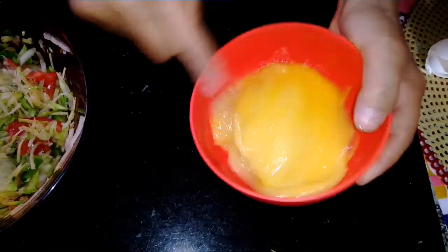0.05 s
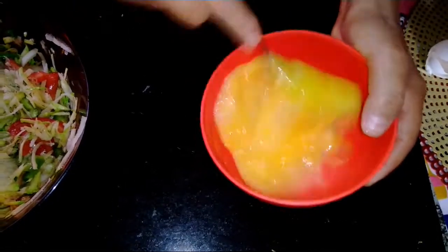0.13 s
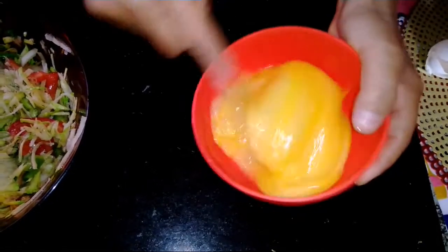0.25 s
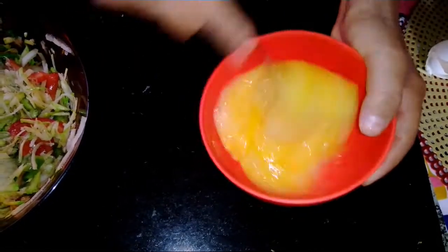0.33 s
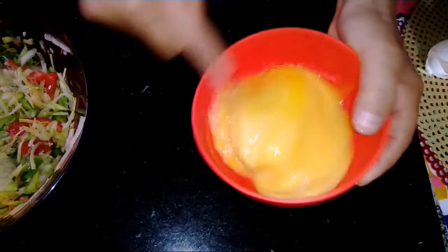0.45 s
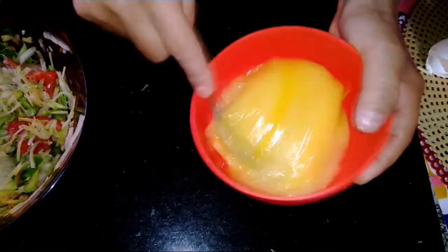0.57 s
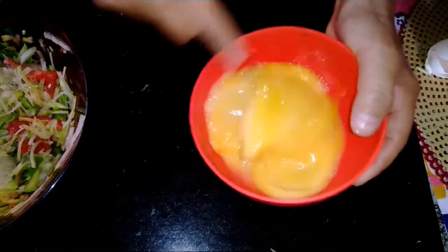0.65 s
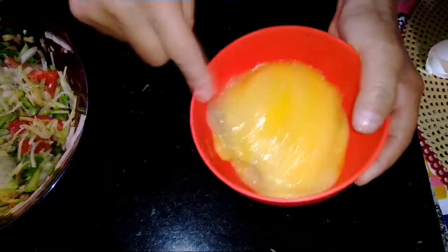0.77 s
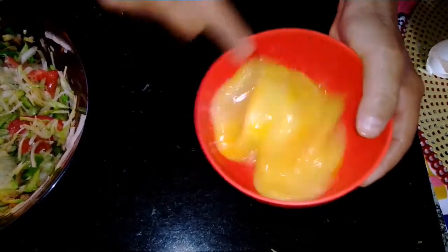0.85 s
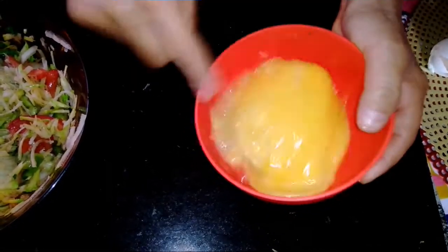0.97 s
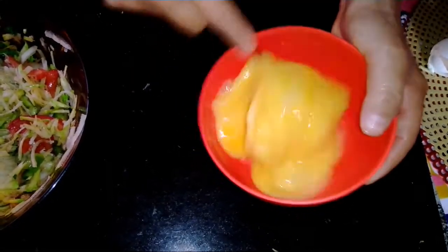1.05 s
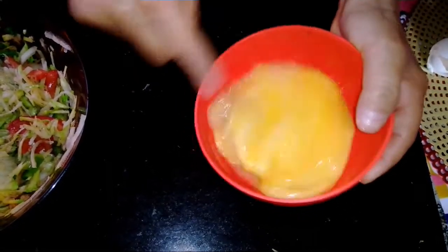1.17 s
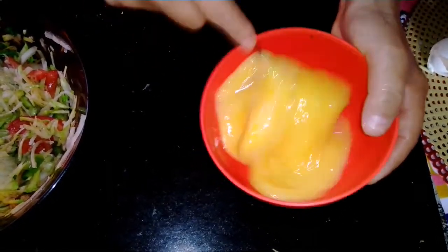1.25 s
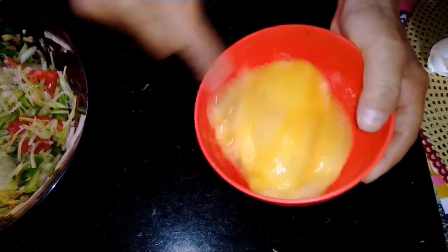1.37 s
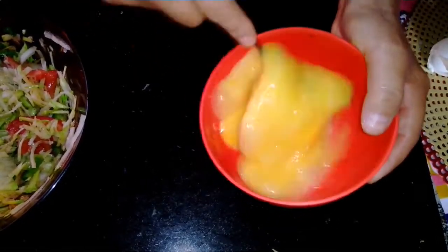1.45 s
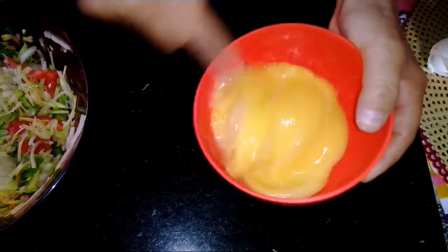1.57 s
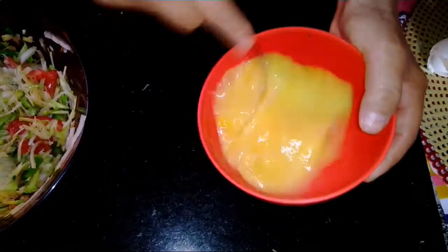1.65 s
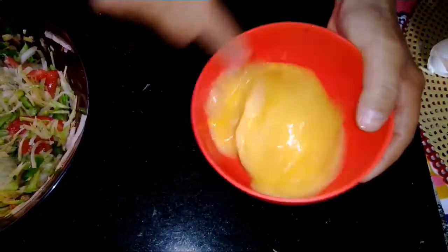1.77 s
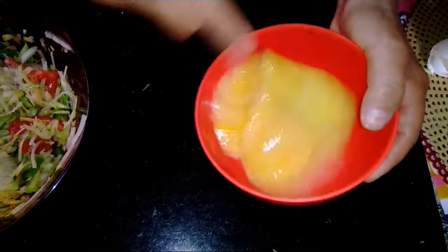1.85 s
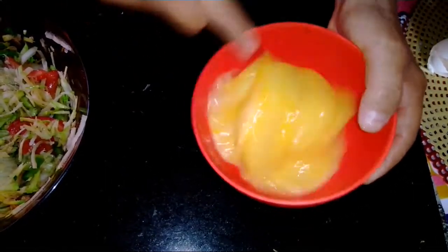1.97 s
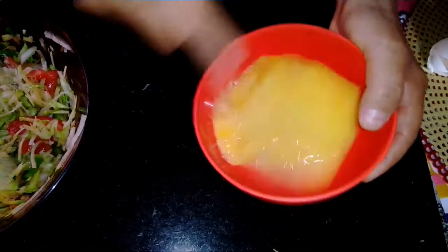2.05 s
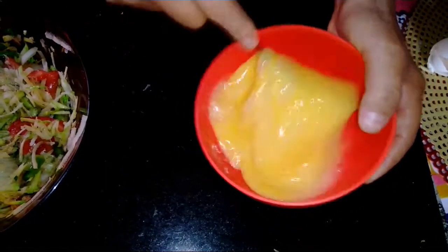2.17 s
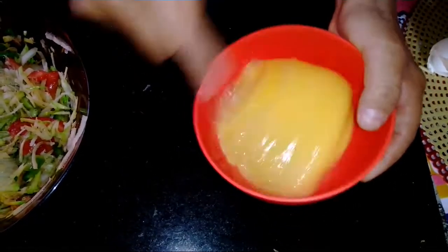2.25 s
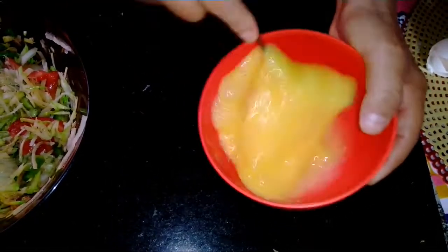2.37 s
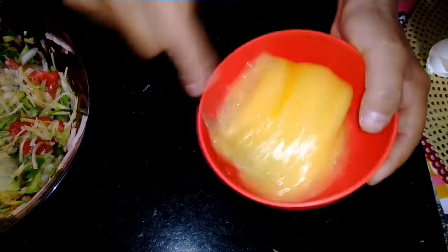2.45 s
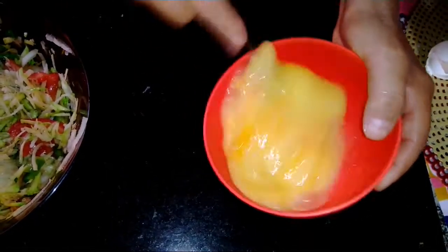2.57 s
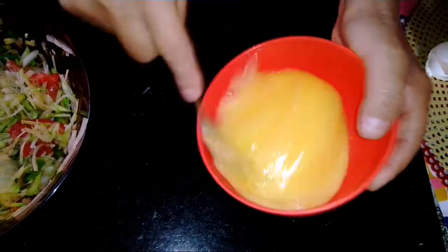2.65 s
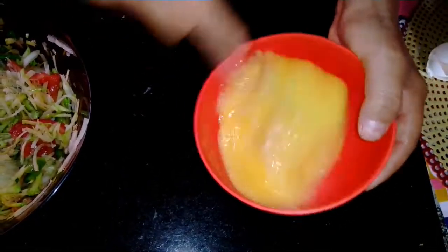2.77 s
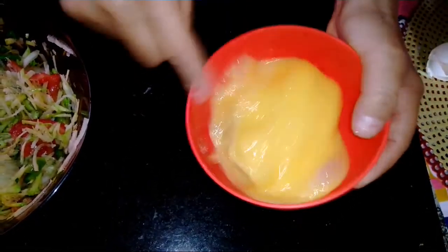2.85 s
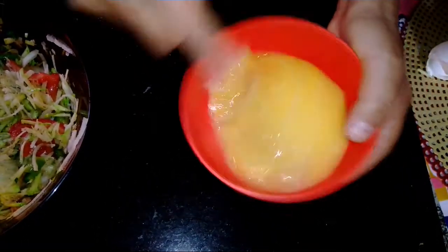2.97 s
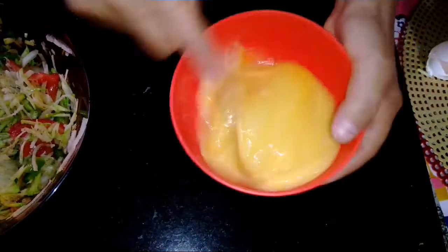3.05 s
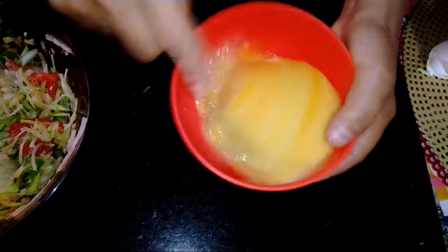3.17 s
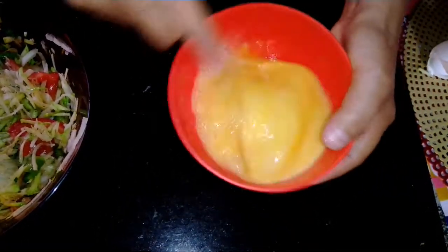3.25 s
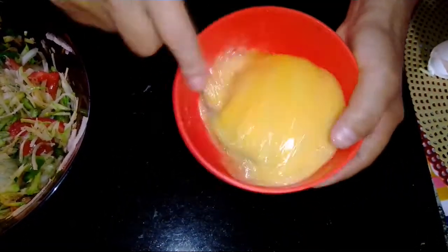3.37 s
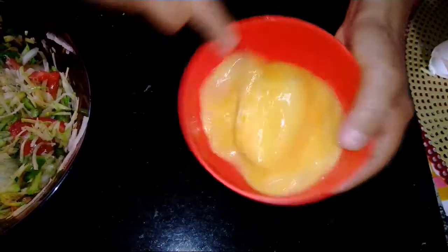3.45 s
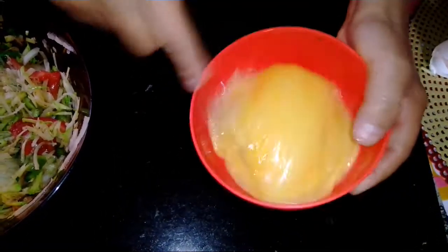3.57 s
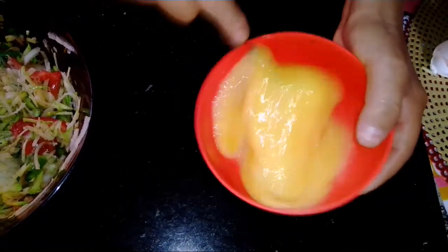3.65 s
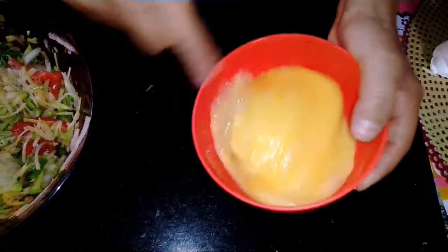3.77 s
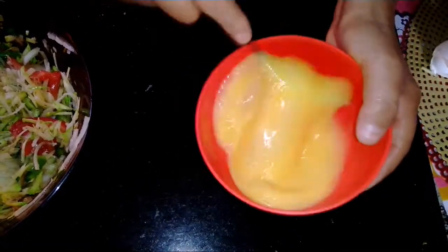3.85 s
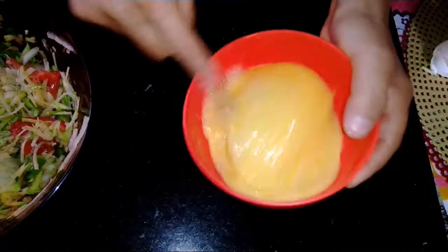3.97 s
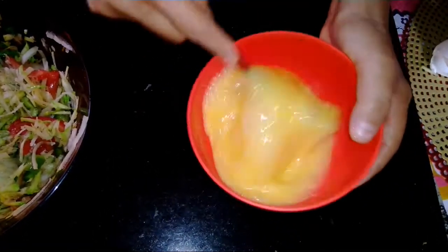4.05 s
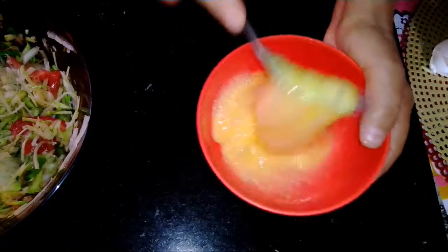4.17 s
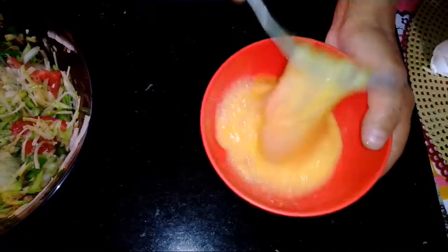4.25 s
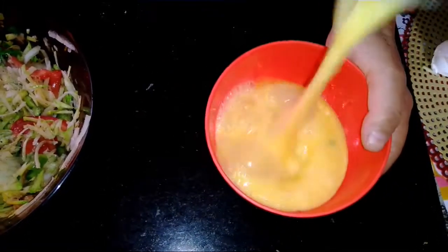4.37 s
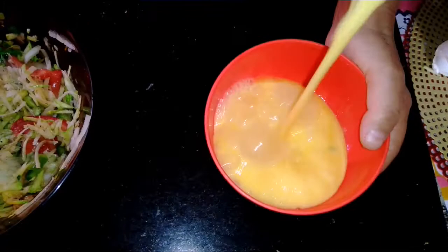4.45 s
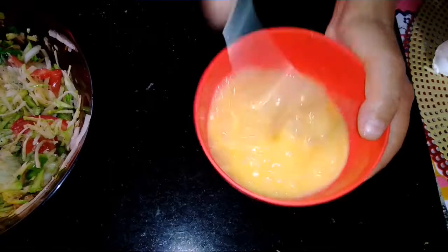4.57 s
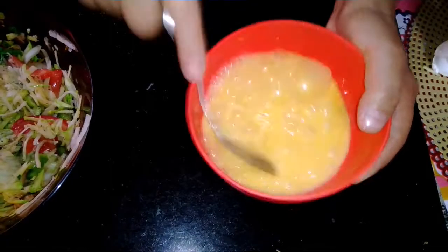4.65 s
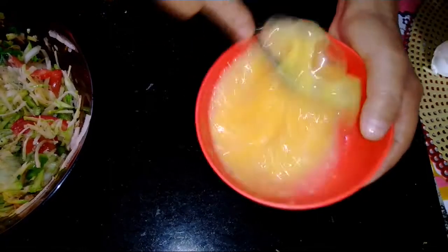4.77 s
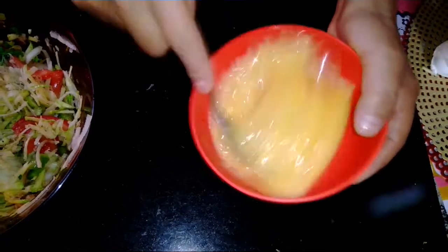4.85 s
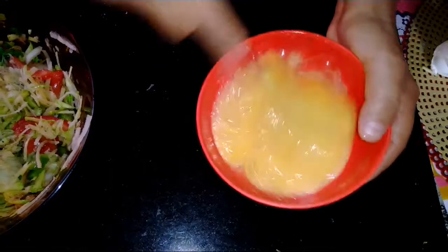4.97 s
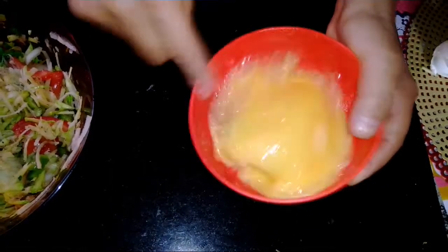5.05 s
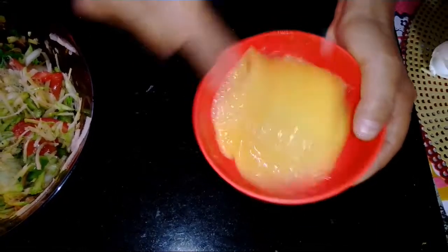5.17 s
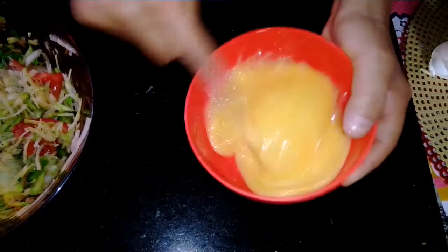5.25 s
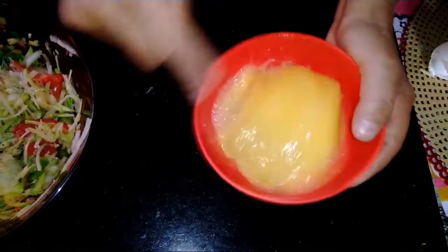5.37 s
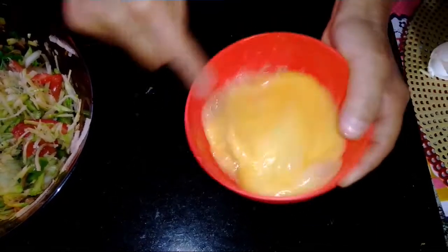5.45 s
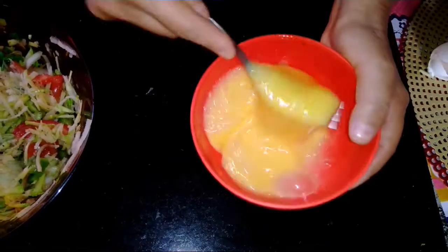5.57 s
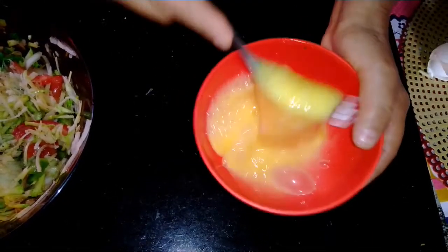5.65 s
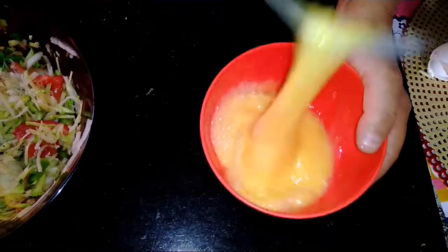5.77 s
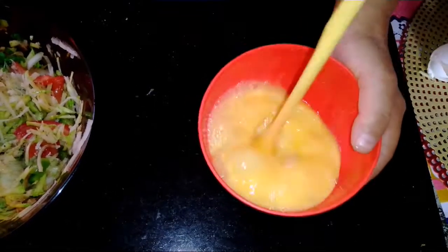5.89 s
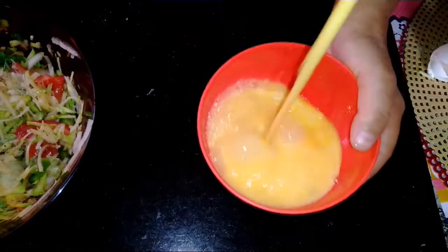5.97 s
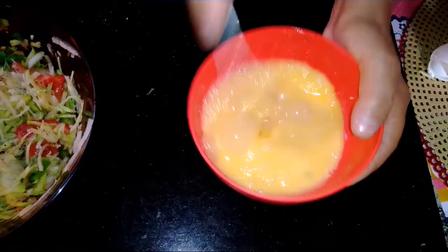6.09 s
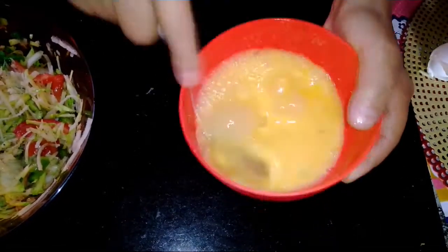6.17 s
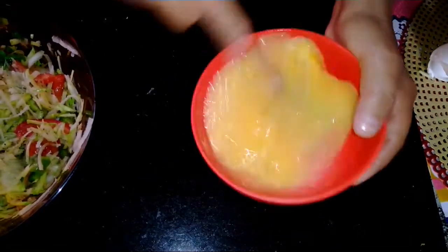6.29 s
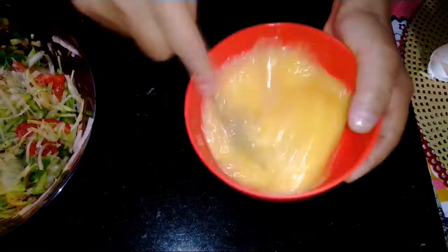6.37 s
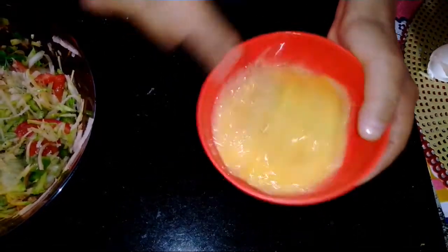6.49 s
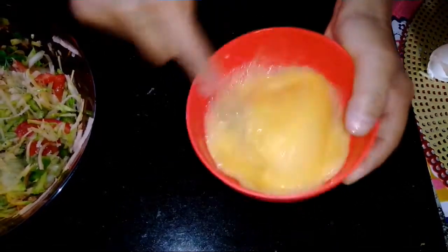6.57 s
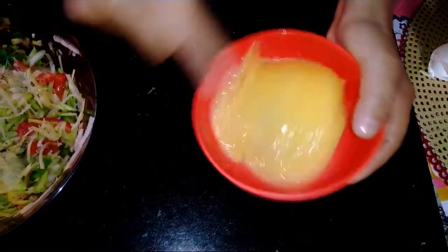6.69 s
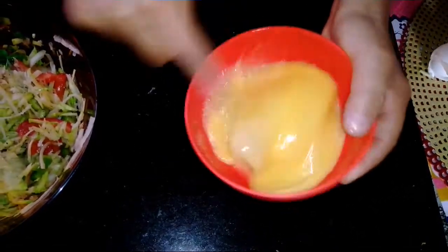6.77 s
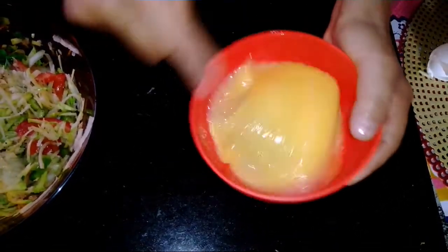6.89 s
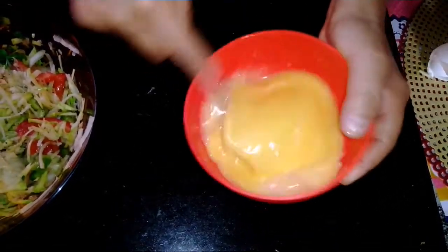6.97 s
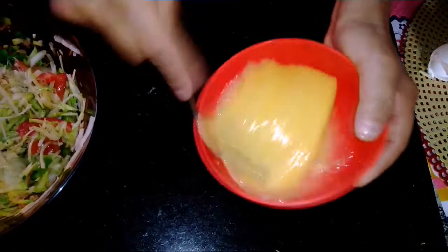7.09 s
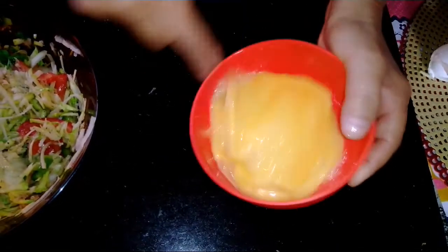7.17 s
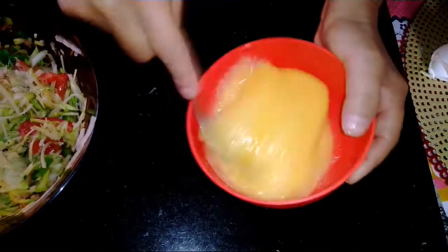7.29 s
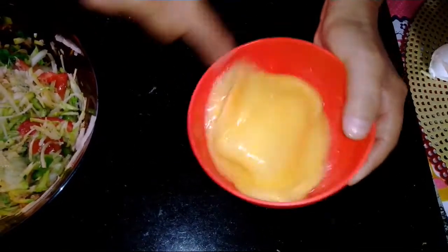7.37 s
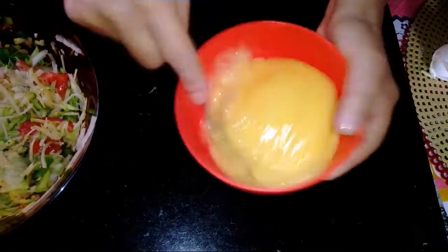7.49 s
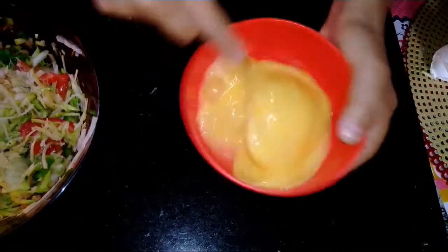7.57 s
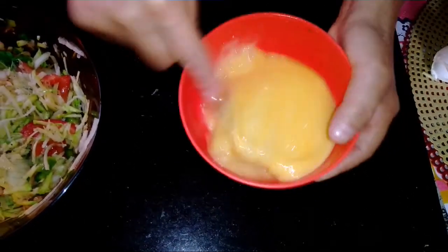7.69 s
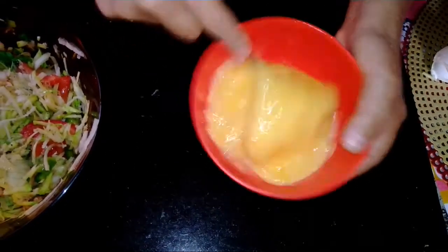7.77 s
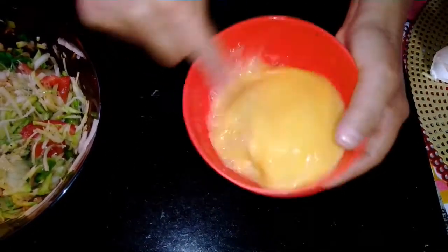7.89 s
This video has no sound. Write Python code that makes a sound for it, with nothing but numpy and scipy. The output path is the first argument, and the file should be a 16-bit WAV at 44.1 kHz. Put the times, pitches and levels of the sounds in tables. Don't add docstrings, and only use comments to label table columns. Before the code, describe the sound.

From 0 s, already in motion, a steel fork beats raw eggs in a hand-held plastic bowl, close to a phone in a small hard-walled kitchen. Strokes come evenly, a little over five per second: a sharp knock on plastic with a bright steel tick, then a wet slosh, airy hiss and slight rasp up the wall. Irregular gulps, hollow plops, slaps and short ringing tine catches vary each stroke. Around 4.05 s a last heavy slap ends the bout; until 4.7 s only tiny drips pop in near silence. Five strokes follow from 4.7 to 5.5 s. From about 5.55 to 6.2 s the fork drips again, small crisp pops thinning out, with a very faint pipe tone near 6 s. Beating resumes at 6.24 s, slightly softer, and continues at the same pace until the end at about 8 s. The sound is mono, with a short kitchen reflection and hardly any background.

```python
import sys
import numpy as np
from scipy import signal
from scipy.fft import rfft, irfft
from scipy.io import wavfile
from scipy.ndimage import uniform_filter1d, minimum_filter1d

SR = 44100
rng = np.random.default_rng(int(sys.argv[2]) if len(sys.argv) > 2 else 0)


def volts_from_db(level):
    exponent = np.asarray(level, float) / 20
    return 10 ** exponent


def int16_out(signal):
    q = np.round(np.clip(np.atleast_2d(signal).T, -1, 1) * 32767)
    wavfile.write(sys.argv[1], SR, q.astype(np.int16))


N = 349713

# f/Hz, level/dB
RUMBLE_TILT = [(25, 2.5), (100, 7.5), (400, -9.5), (16000, -35.5)]
# start t/s, end t/s
PIPE_SPELLS = [
    (5.88, 6.06),
    (6.3, 6.44),
]
# t/s, boom over wall level/dB
GRIP = [(0, -12), (1.2, -4), (1.8, -12), (3, -5.5), (4, -13), (4.75, -56), (4.93, -19), (5.4, -8.5),
        (6.3, -44), (6.46, -17.5), (7.9, -9)]

# t/s, length/s, pressure level/dB
DRAGS_LONG_BOUT = [(-.105, 0.14, -50.5), (0.088, 0.12, -41), (0.276, 0.12, -42.5), (0.469, .12, -40),
                   (0.652, 0.11, -42), (0.84, 0.12, -41.5), (1.03, 0.12, -41), (1.216, 0.13, -41),
                   (1.401, 0.13, -40.5), (1.593, 0.12, -40), (1.781, 0.12, -40), (1.965, 0.12, -40.5),
                   (2.151, 0.12, -40), (2.338, 0.13, -40), (2.53, 0.083, -42.5), (2.702, 0.1, -46),
                   (2.785, 0.032, -40.5), (2.897, 0.1, -38.5), (3.073, 0.11, -42), (3.247, 0.12, -41.5),
                   (3.453, 0.094, -41), (3.631, 0.11, -39.5), (3.823, 0.094, -38), (4.001, 0.065, -42)]
# t/s, length/s, pressure level/dB
DRAGS_SHORT_BOUTS = [(4.722, 0.11, -38), (4.925, 0.074, -38.5), (5.099, 0.11, -39), (5.282, 0.1, -40),
                     (5.467, 0.097, -44), (6.24, 0.13, -41.5), (6.445, 0.078, -40.5), (6.616, 0.12, -41.5),
                     (6.811, .12, -43), (6.999, 0.13, -42), (7.185, 0.14, -42.5), (7.386, 0.11, -41.5),
                     (7.572, 0.11, -43.5), (7.751, 0.13, -45.5)]
# share of the stroke/1, slosh level/dB, hiss level/dB, rasp level/dB
DRAG_SWELL = [
    (-.16, -53, -49.5, -50),
    (0, 6, 5.5, -3.5),
    (0.151, 2, -7, -6),
    (0.348, 1.5, 4.5, -7),
    (0.549, -1.5, 4, -4.5),
    (0.702, -6.5, -3, -0.5),
    (.88, -27.5, -6, -2.5),
    (0.95, -30, -17.5, -16),
    (1.121, -36.5, -30, -28),
]
# f/Hz, width/Hz, level/dB
SLOSH_MODES = [(127, 280, -17.5), (500, 59, -3), (1020, 120, -1), (1250, 410, -2.5)]
# f/Hz, width/Hz, level/dB
HISS_MODES = [(4700, 1200, -8), (6370, 780, 1.5), (8100, 1600, -3.5), (9680, 650, 3), (11050, 1800, -5.5),
              (14000, 2000, -22.5)]
# f/Hz, width/Hz, level/dB
RASP_MODES = [(1873, 280, -1), (2222, 110, 5.5), (2973, 470, -3.5), (4370, 670, -6.5), (8850, 1600, -21.5)]
# start t/s, end t/s, bubble f/Hz, level/dB, ring/cycles
THREADS = [
    (4.458, 4.62, 1300, -65, 4),
    (4.456, 4.58, 1900, -68, 4),
    (6.0, 6.07, 1300, -64, 5),
]
# f/Hz, t60/s
KITCHEN_DECAY = [(300, 0.45), (2000, 0.3), (6000, 0.26), (14000, 0.22)]

# t/s, f/Hz, level/dB
GULPS = [(0.031, 407, -43), (0.131, 465, -39), (2.586, 366, -49.5), (0.511, 610, -48), (0.536, 554, -34.5),
         (3.266, 406, -40), (0.719, 518, -44), (0.97, 422, -43.5), (0.971, 700, -41), (1.447, 393, -46),
         (1.173, 443, -43), (1.174, 716, -44.5), (1.273, 557, -46.5), (1.463, 556, -35.5),
         (1.829, 700, -51.5), (2.043, 483, -40), (1.853, 500, -49), (1.927, 408, -42), (2.02, 530, -37.5),
         (2.605, 353, -49), (2.207, 473, -46), (2.23, 620, -40.5), (6.46, 414, -46), (2.417, 370, -47),
         (2.459, 360, -48), (2.742, 384, -49), (2.779, 730, -45.5), (2.923, 346, -44.5),
         (3.121, 350, -46.5), (3.14, 334, -51.5), (3.48, 366, -48.5), (3.915, 384, -50), (4.053, 409, -45),
         (4.955, 646, -32.5), (5.207, 366, -45.5), (5.53, 656, -41.5), (6.882, 582, -47.5),
         (6.934, 476, -42.5), (7.209, 377, -41), (7.624, 423, -50)]
# t/s, f/Hz, level/dB
PLOPS = [(0.119, 1073, -46.5), (0.706, 1084, -36), (0.891, 1145, -39.5), (1.084, 1290, -36.5),
         (1.174, 1106, -36.5), (1.24, 1040, -41), (1.275, 974, -36), (1.281, 1270, -37), (7.225, 1052, -43),
         (1.463, 1012, -34.5), (1.494, 1250, -44), (1.636, 1006, -43), (1.637, 1250, -38),
         (1.825, 1115, -47), (1.859, 1010, -39.5), (1.928, 1026, -43), (1.997, 1130, -42),
         (2.021, 1035, -39), (2.036, 1300, -41), (2.186, 1080, -43), (2.549, 954, -37), (2.741, 1020, -31),
         (2.925, 1155, -37), (2.946, 1310, -43), (6.705, 1470, -46), (3.302, 1136, -42.5),
         (3.654, 983, -34), (4.774, 958, -40.5), (4.969, 1250, -38), (5.159, 1170, -39.5),
         (6.488, 1213, -46), (6.635, 1120, -43), (6.84, 1146, -40), (6.885, 1033, -40.5),
         (7.021, 1020, -47), (7.061, 1245, -46), (7.207, 975, -43), (7.209, 1260, -36)]
# t/s, f/Hz, level/dB
CATCHES = [(0.17, 3200, -37), (0.358, 2190, -37), (0.531, 2030, -40), (0.552, 3330, -35.5),
           (0.561, 3090, -33.5), (0.566, 2270, -46), (0.902, 2170, -34), (0.97, 1684, -35),
           (1.1, 2300, -33), (1.174, 1790, -38), (1.316, 2320, -32), (1.495, 2230, -39), (1.663, 1860, -38),
           (2.783, 2170, -40), (2.238, 2290, -36), (2.427, 2880, -40), (2.428, 3240, -39.5),
           (2.43, 2240, -34), (2.795, 3360, -33), (2.801, 2230, -33), (2.803, 2740, -39),
           (2.974, 2120, -35.5), (3.329, 2080, -41.5), (3.353, 1830, -41), (3.515, 2200, -38),
           (3.652, 2167, -39), (7.089, 2200, -44), (3.838, 1873, -41), (3.839, 2230, -38),
           (3.893, 3170, -32), (3.903, 2080, -40), (3.905, 2370, -33), (4.808, 2795, -35.5),
           (4.809, 2230, -44.5), (2.802, 4350, -33.5), (4.965, 2300, -46), (4.965, 3190, -36.5),
           (5.167, 2240, -38.5), (5.316, 1657, -33.5), (5.339, 2290, -40.5), (5.529, 1725, -39),
           (6.332, 2115, -40), (6.506, 1796, -37), (7.097, 3290, -30.5), (7.101, 2200, -36.5),
           (7.257, 1770, -36), (7.27, 2490, -35), (7.635, 1700, -36), (7.854, 2220, -38)]

# t/s, energy level/dB in wall, rim, tines
SLAPS = [(0.032, -31, -30.5, -34), (0.123, -37, -40, -9.5), (0.138, -22, -37, -14), (0.202, -51, -40, -52),
         (0.539, -21, -29, -29), (0.625, -22.5, -44, -29), (1.083, -30, -24, -34), (1.316, -50, -31, -39),
         (1.465, -24, -32, -12), (2.547, -19, -30, -16), (2.785, -38, -31, -28), (4.054, -13.5, -21, -21),
         (4.81, -49, -22, -9), (5.531, -15.5, -36.5, -10.5), (6.403, -31.5, -56, -48),
         (6.035, -26.5, -32, -45), (4.457, -41, -43.5, -69), (2.799, -51, -19, -6),
         (7.061, -24, -16.5, -36), (7.1, -40, -25, -19)]
# t/s, energy level/dB, wall thud over it/dB, tine bite over it/dB
KNOCKS_LONG_BOUT = [(0.0863, 1, -0.5, 1.5), (0.2789, 1, 2, 0.5), (.465, 2, -8.5, -2),
                    (0.6458, -2.5, -4.5, -5), (0.8372, -3, -12.5, -4), (1.0328, -7, -8, -6),
                    (1.215, -1.5, -8, -0.5), (1.4079, -9, -26, 0.5), (1.59, -10, -3, 5.5),
                    (1.782, -3, -33, -5), (1.9694, -9, -2, 2.5), (2.1577, -3.5, -9, -0.5),
                    (2.3399, -2.5, -7.5, 4), (2.5272, -3.5, -23, -10.5), (2.7068, -4, -7, 9),
                    (2.8974, -2.5, -3, -5), (3.0778, -4, 1.5, -6), (3.2452, -12, -1, 5),
                    (3.4537, -8.5, 6, -33), (3.633, -5.5, -8, -1.5), (3.823, -5.5, -12.5, -18.5),
                    (4.002, 2, -14.5, -3)]
# t/s, energy level/dB, thud/dB, bite/dB
KNOCKS_SHORT_BOUTS = [(4.7277, -17, 14.5, 10.5), (4.9262, -4.5, -3, 4), (5.0977, -3, -4.5, 2.5),
                      (5.2847, 1, -6, -4.5), (5.4656, 0.5, -3, -3), (6.2417, -13, 8.5, 4),
                      (6.447, -7.5, -5, 11.5), (6.6194, -3.5, -5, 0.5), (6.812, -2, -9, -1),
                      (7.0049, -7, -21, 2.5), (7.1842, -2, -6.5, 3), (7.3988, -13.5, 1, 5.5),
                      (7.572, -2.5, -21, -4), (7.7478, -13.5, -2.5, 2.5)]
# t/s, energy level/dB, thud/dB, bite/dB
BOUNCES = [(0.2735, -11.5, -22, -10), (0.6398, -21, -6, -9), (0.8406, -8, -4, -2), (1.03, -21.5, -12, 17.5),
           (1.2186, -15, -11, 11.5), (1.2435, -34, 20, 3), (1.5953, -5.5, -3, -11), (1.961, -32.5, 18, 13),
           (2.149, -32, 16.5, 8), (2.157, -45, 2, 15), (2.334, -31.5, -11, 21), (2.5319, -27.5, -9, 27.5),
           (3.059, -19.5, 0.5, -2), (3.263, -7.5, 6.5, -13), (3.2869, -19, -3.5, 4), (3.4606, -25, 0, 14),
           (3.6524, -15.5, 5.5, 8.5), (3.826, -14, 4, -3.5), (3.84, -7.5, -7, -5), (4.724, -13.5, 10, 7),
           (5.117, -16.5, -3, -4), (5.2892, -16.5, -7, 11.5), (5.453, -27, -32, 15), (5.486, -19, -6, 2.5),
           (6.435, -36, -18, 7), (6.9962, -22, 2, 11), (7.2076, -27.5, 17, 18), (7.2228, -14, -7, 4),
           (7.384, -38, -5, 11), (7.5699, -12, 2.5, 6), (7.7578, -10.5, 2, -2)]
# t/s, energy level/dB, thud/dB, bite/dB
RETURNS = [(.213, -30, 6, 4), (0.4, -24, -17, 4), (0.6104, -30.5, -6, 11), (0.706, -41, 15, 10),
           (0.768, -24.5, 4.5, 11), (0.968, -27.5, 6, 18.5), (0.975, -21.5, -13, 4.5),
           (1.1762, -14.5, -13, 8.5), (1.554, -27.5, 2, 1), (1.572, -29, 0, -2), (1.9265, -25, -7, 8),
           (1.9303, -23, 5, 1.5), (2.102, -22, -11, -1.5), (2.459, -27.5, 1, 6), (2.743, -28, 17, 16),
           (3.023, -31.5, 5, -19), (3.035, -25, -29.5, 12.5), (3.5378, -19.5, -16, 5.5),
           (3.8975, -29.5, -35, -7), (4.6064, -32.5, -4, 12), (5.44, -27.5, -4, 3), (6.933, -19.5, -4, 2.5),
           (7.477, -20, -40, 9.5), (7.863, -25.5, -30, 7.5)]
# f/Hz, width/Hz, level/dB
BOOM_MODES = [(91, 59, -13.5), (351, 35.4, 14), (500, 180, -2.5)]
# f/Hz, width/Hz, level/dB
WALL_MODES = [(660, 590, -21), (1009, 167, 7.5), (1270, 486, 0.5)]
# f/Hz, width/Hz, level/dB
RIM_MODES = [(1770, 88, 0), (2328, 140, -1.5), (2726, 490, -3.5), (3240, 1120, -7), (4430, 2200, -17.5)]
# f/Hz, width/Hz, level/dB
TINE_MODES = [(5730, 710, -9), (7130, 370, -1), (7694, 440, -3.5), (9014, 650, 0), (10700, 860, -0.5),
              (11370, 1500, -6), (13900, 1300, -25.5)]

# t/s, f/Hz, energy level/dB
SPLASHES = [(.236, 9000, -26), (1.541, 2350, -15), (2.285, 1680, -22), (2.693, 11900, -25.5),
            (4.8566, 10100, -26), (5.048, 7000, -29), (5.0827, 11900, -28.5), (5.2727, 5750, -31),
            (5.424, 10800, -14), (6.3776, 2080, -26), (6.587, 1600, -28), (7.322, 1790, -25),
            (7.3243, 6900, -26), (7.371, 9000, -21), (7.5554, 7100, -20),
            (0.053, 8000, -33), (0.592, 630, -38.5), (0.592, 2700, -30), (0.592, 8000, -21),
         (2.287, 9000, -27), (2.295, 7870, -22), (3.9, 1500, -36), (4.225, 2701, -45), (4.262, 1950, -41),
         (4.863, 1110, -31.5), (5.033, 11500, -33), (5.052, 418, -27), (5.212, 1600, -34),
         (5.796, 2940, -52), (6.008, 6500, -37), (6.228, 1600, -37), (6.418, 11000, -38)]
# t/s, f/Hz, energy level/dB
DRIPS = [(4.1294, 7800, -37.5), (4.195, 2240, -44), (4.262, 2510, -36.5), (4.291, 2430, -43),
         (4.3658, 8300, -48), (4.459, 7350, -26.5), (4.468, 3630, -38), (4.518, 1800, -34),
         (4.5627, 1300, -36.5), (4.5626, 8800, -41), (4.677, 8000, -33), (4.708, 6400, -20),
         (5.585, 6000, -25), (5.609, 2190, -29), (5.608, 8100, -23.5), (5.6435, 5250, -30.5),
         (5.644, 3900, -30), (5.6758, 9400, -27.5), (5.699, 2960, -43), (5.7669, 6900, -43.5),
         (5.8217, 2970, -43.5), (5.8791, 8960, -45.5), (5.921, 8970, -40), (5.992, 6700, -40),
         (6.007, 9000, -34), (6.0193, 9200, -31.5), (6.18, 8660, -52), (4.707, 9700, -25.5),
         (1.34, 8800, -24), (5.992, 10000, -42), (1.358, 7000, -28), (6.056, 10000, -42.5),
         (5.916, 1910, -51.5), (5.707, 8000, -50), (1.3, 8500, -21.5), (4.597, 1070, -36),
         (5.682, 1010, -40), (6.038, 4340, -50), (6.037, 6200, -41), (5.644, 2900, -36)]


def unit(x):
    return x / np.sqrt(np.mean(x ** 2) + 1e-20)


def along(points, hz):
    f, v = np.transpose(points)
    return np.interp(np.log(hz + 1), np.log(f + 1), v)


def place(times, sounds):
    where = np.round(times * SR).astype(int)[:, None] + np.arange(sounds.shape[1])
    return np.bincount(np.clip(where, 0, N).ravel(), sounds.ravel(), N + 1)[:N]


def resonate(x, modes, scatter_db=0):
    f = np.fft.rfftfreq(x.shape[-1], 1 / SR)
    luck = np.asarray(scatter_db) * rng.standard_normal((len(x), len(modes)))
    bend = volts_from_db(0.06 * luck[:, ::-1])
    body = 0
    for k, (center, width, db) in enumerate(modes):
        strength = (-1) ** k * volts_from_db(db + luck[:, k, None])
        tuned = center * center * bend[:, k, None] ** 2
        body = body + strength * 1j * f * width / (tuned - f * f + 1j * f * width)
    return irfft(rfft(x) * body, x.shape[-1])


def patchy(depth_db, count, size):
    z = signal.stft(rng.standard_normal(N + 512), nperseg=256)[2]
    field = uniform_filter1d(rng.standard_normal(z.shape), count, 0)
    field = uniform_filter1d(field, size, 1)
    return signal.istft(z * volts_from_db(depth_db * unit(field)), nperseg=256)[1][:N]


def bubbles(start_s, hz, db, cycles, count=700, rise=0.1):
    t = np.arange(count) / SR
    age = t * hz[:, None] / cycles
    swell = age * np.exp(1 - 3 * age)
    tone = np.sin(2 * np.pi * hz[:, None] * t * (1 + rise * age))
    return place(start_s, volts_from_db(db)[:, None] * swell * tone)


def boom_db(s):
    return np.interp(s, *np.transpose(GRIP))


def background():
    t = np.arange(N) / SR
    tilt = volts_from_db(along(RUMBLE_TILT, np.fft.rfftfreq(N, 1 / SR)))
    rumble = irfft(rfft(patchy(4.9, count=2, size=12)) * tilt, N)
    swell = np.zeros(N)
    for start, end in PIPE_SPELLS:
        swell += np.clip((t - start) / 0.018, 0, 1) * volts_from_db(-130 * np.maximum(t - end, 0))
    breath = unit(resonate(rng.standard_normal((1, N)), [(684, 36, 0)])[0])
    pipe = np.sin(2 * np.pi * 685 * t) + 0.28 * breath
    return volts_from_db(-89.0) * unit(rumble) + volts_from_db(-77.5) * swell * pipe


def strokes():
    return [(s, length, db - 5 + 0.33 * boom_db(s), db - 3, db)
            for s, length, db in DRAGS_LONG_BOUT + DRAGS_SHORT_BOUTS]


def drags():
    t = np.arange(N) / SR
    share, *swell = np.transpose(DRAG_SWELL)
    when, pitch, size = rng.random((5000, 3)).T
    glugs = unit(bubbles(when * N / SR, 560 * volts_from_db(20 * pitch), 14 * size ** 3, cycles=5.9, count=400, rise=0.053))
    snaps = 2.2 * (rng.random(N) < 900 / SR) * rng.laplace(size=N)
    # modes, patch depth in dB, share of folded air
    parts = [(SLOSH_MODES, 3, 0.3), (HISS_MODES, 4.5, 0.15), (RASP_MODES, 4, 0.42)]
    out = np.zeros(N)
    for k, (modes, depth_db, air) in enumerate(parts):
        gain = np.zeros(N)
        for s, length, *db in strokes():
            near = slice(max(round((s - 0.26 * length) * SR), 0), round((s + 1.3 * length) * SR))
            progress = (t[near] - s) / length
            gain[near] += volts_from_db(db[k] + np.interp(progress, share, swell[k], left=-90, right=-90))
        grit = volts_from_db(1.0 * unit(uniform_filter1d(rng.standard_normal(N), size=60)))
        friction = grit * unit(patchy(depth_db, count=5, size=6)) + snaps
        rub = unit(resonate(friction[None], modes)[0])
        out += gain * unit(rub + air * glugs)
    return out


def trickle():
    falling = [(s + 0.22 * length, s + 2.5 * length, 7500, hiss_db - 8.5, 1.8)
               for s, length, _, hiss_db, _ in strokes()]
    out = np.zeros(N)
    for start, end, hz, db, cycles in THREADS + falling:
        when, pitch, size = rng.random((90, 3)).T
        moments = start + (end - start) * when
        out += bubbles(moments, hz * np.exp(1.3 * (pitch - 0.5)), db + 10 * size ** 5, cycles)
    return out


def kitchen(x):
    out, step = np.zeros(N + SR), 8192
    for a in range(0, N, step):
        hz, t, z = signal.stft(rng.standard_normal(SR // 2), SR, nperseg=256)
        decay = volts_from_db(-60 * t / along(KITCHEN_DECAY, hz)[:, None])
        tail = signal.istft(z * decay, SR, nperseg=256)[1]
        wet = signal.fftconvolve(x[a:a + step], tail / np.linalg.norm(tail))
        out[a + 200:][:len(wet)] += wet
    return out[:N]


def pockets():
    kinds = [(GULPS, 6, 12, 0.05), (PLOPS, 10, 11.5, 0.03), (CATCHES, 17, 9.5, 0)]  # cycles, gain dB, pitch rise
    out = np.zeros(N)
    for table, cycles, gain_db, rise in kinds:
        s, hz, db = np.transpose(table)
        out += bubbles(s, hz * (1 - rise), db + gain_db, cycles, count=2000, rise=rise)
    out = out * (1 + 0.75 * unit(uniform_filter1d(rng.standard_normal(N), size=45)))
    return signal.sosfilt(signal.butter(2, 200, "high", fs=SR, output="sos"), out)


def contacts():
    s, rim, thud, bite = np.transpose(KNOCKS_LONG_BOUT + KNOCKS_SHORT_BOUTS + BOUNCES + RETURNS)
    plastic = rim + 10 * np.log10(1 + volts_from_db(2 * thud))
    return list(zip(s, plastic + boom_db(s), rim + thud, rim, rim + bite))


def taps():
    slaps = [(s, wall + 3 + boom_db(s), wall, rim, tines) for s, wall, rim, tines in SLAPS]
    steel = contacts()
    rows = np.array(steel + slaps)
    t = np.arange(4096) / SR
    soft = np.where(np.arange(len(rows))[:, None] < len(steel), 1, 2.2)
    # modes, chatter s, rise s, scatter dB
    parts = [(BOOM_MODES, 0.004, 0.0015, 2), (WALL_MODES, 0.012, 0.0015, 2.5),
             (RIM_MODES, 0.011, 0.0008, 2.8), (TINE_MODES, 0.012, 0.0005, 2.8)]
    out = np.zeros(N)
    for level, (modes, chatter_s, rise_s, scatter_db) in zip(rows[:, 1:].T, parts):
        spikes = rng.standard_normal((len(rows), len(t)))
        fall_db = -60 * t / soft / chatter_s
        fall = volts_from_db(fall_db) + volts_from_db(-14 + fall_db / 3)
        push = (1 - np.exp(-t / soft / rise_s)) * fall * spikes * np.abs(spikes) ** 0.8
        push[:, round(0.001 * SR)] += 8 / soft[:, 0] ** 2
        ring = resonate(push, modes, scatter_db)
        out += place(rows[:, 0], ring * (volts_from_db(level) / np.linalg.norm(ring, axis=1))[:, None])
    return out


def drips():
    s, hz, db = np.transpose(DRIPS + SPLASHES)
    t, f = np.arange(1024) / SR, np.fft.rfftfreq(1024, 1 / SR)
    push = t / 0.001 * volts_from_db(-60 * t / 0.011) * rng.standard_normal((len(s), len(t)))
    width = 0.22 * hz[:, None]
    cavity = 1j * f * width / (hz[:, None] ** 2 - f * f + 1j * f * width)
    pop = irfft(rfft(push) * cavity ** 3)
    return place(s - 0.001, pop * (volts_from_db(db - 3.0) / np.linalg.norm(pop, axis=1))[:, None])


def scene():
    bowl = drags() + taps() + pockets()
    drops = trickle() + drips()
    room = kitchen(volts_from_db(-16.5) * bowl + volts_from_db(-11.0) * drops)
    return np.tile(bowl + drops + room + background(), (2, 1))


def duck(x, ahead_s, rise_db):
    level = 10 * np.log10(np.abs(uniform_filter1d(x ** 2, size=88)) + 1e-12)
    lead = round(ahead_s * SR)
    coming = -minimum_filter1d(-level, size=150)
    shut = np.pad(coming[lead:], (0, lead)) - coming > rise_db
    return x * (1 - uniform_filter1d(shut * 1.0, size=60))


def thin(x, mask_db, from_hz, gate_db):
    hz, t, z = signal.stft(x, SR, nperseg=1024)
    hz, z = hz[:512, None], z[:512]
    band = np.repeat(np.abs(z ** 2).reshape(64, 8, -1).mean(axis=1), 8, axis=0)
    chance = np.kron(rng.standard_normal((256, len(t))), np.ones((2, 4)))[:, :len(t)]
    loudest = minimum_filter1d(band[100:].max(axis=0), size=5)
    keep = (band * volts_from_db(10 * chance) > volts_from_db(2 * mask_db) * loudest) | (hz < from_hz)
    fade = np.where(hz > 400, band / (band + volts_from_db(2 * gate_db)), 1)
    z = np.pad(z * keep * fade * (hz < 15900), ((0, 1), (0, 0)))
    return signal.istft(z, SR, nperseg=1024)[1][:N]


def roll_off(x):
    return signal.sosfilt(signal.butter(12, 16800, fs=SR, output="sos"), x)


def record(dry):
    bass = signal.sosfiltfilt(signal.butter(4, 3000, fs=SR, output="sos"), dry[0])
    treble = dry[0] - bass
    mono = duck(bass, ahead_s=0.0041, rise_db=23) + duck(treble, ahead_s=0.013, rise_db=35)
    mono = thin(mono, mask_db=-20.5, from_hz=11000, gate_db=-121)
    return roll_off(np.tile(mono, (2, 1)))


dry = scene()
out = record(dry)
int16_out(out)
```